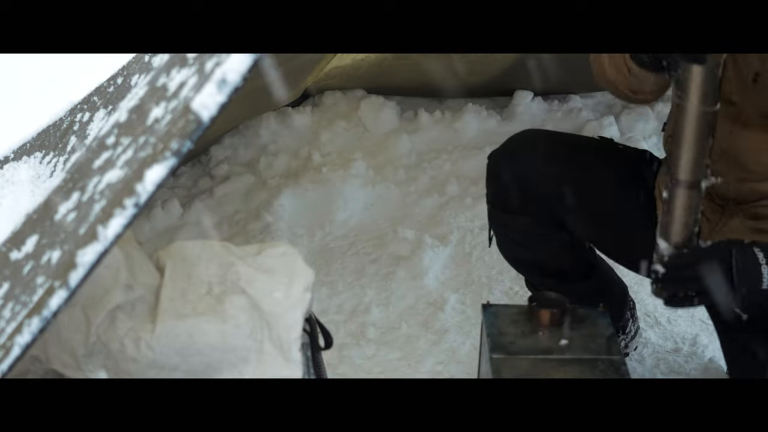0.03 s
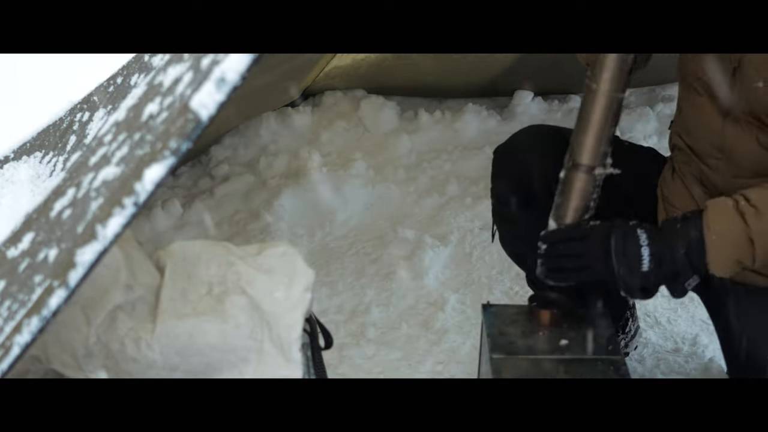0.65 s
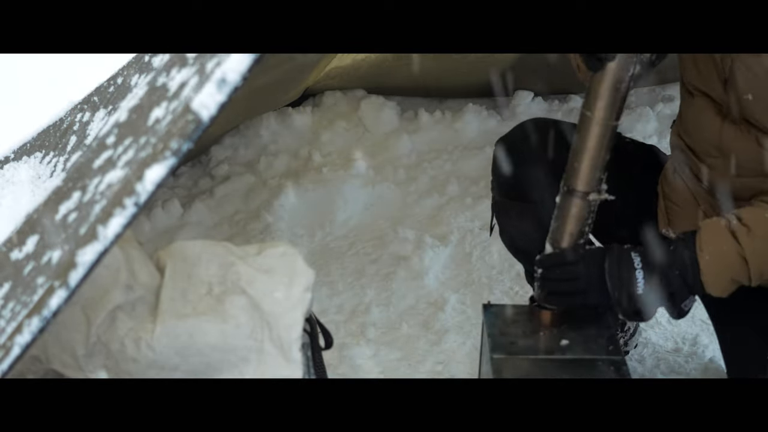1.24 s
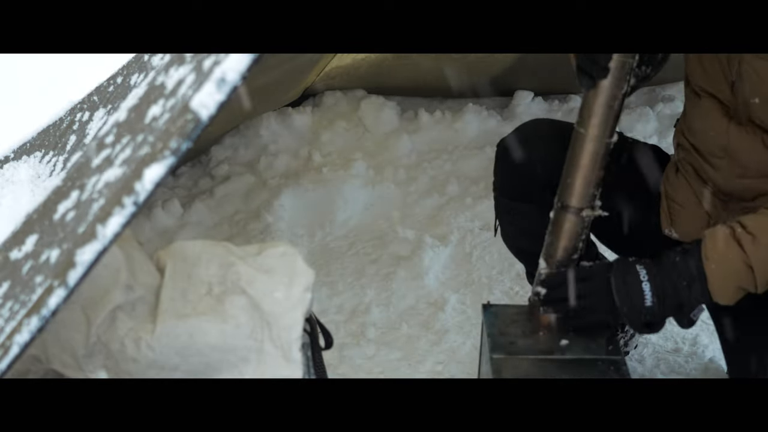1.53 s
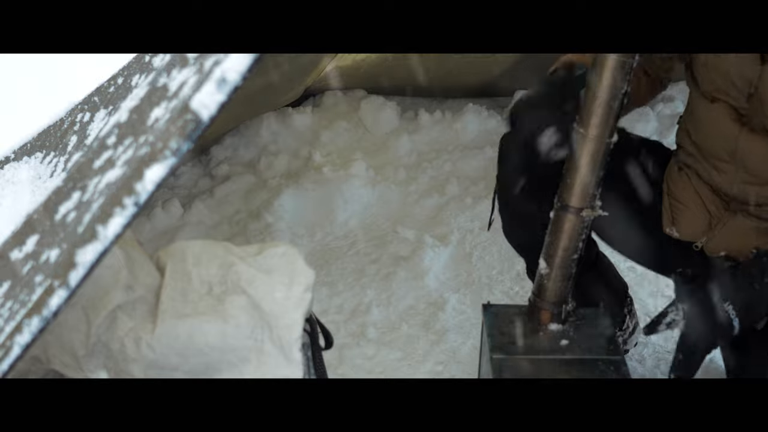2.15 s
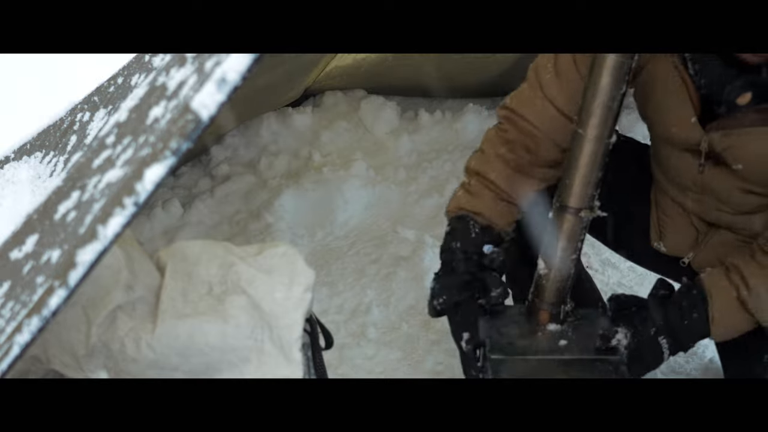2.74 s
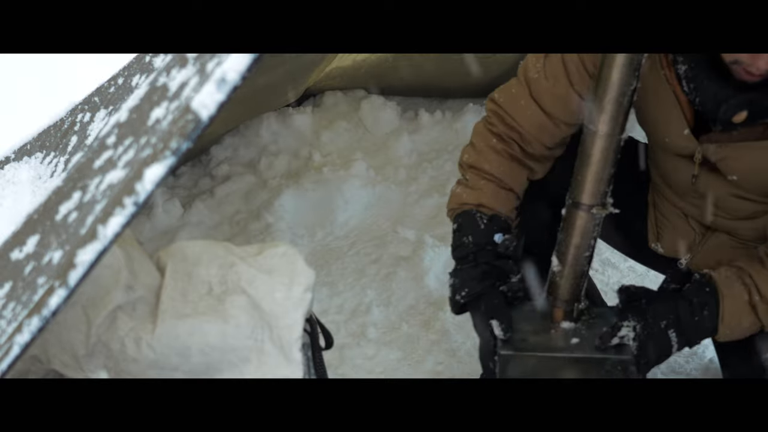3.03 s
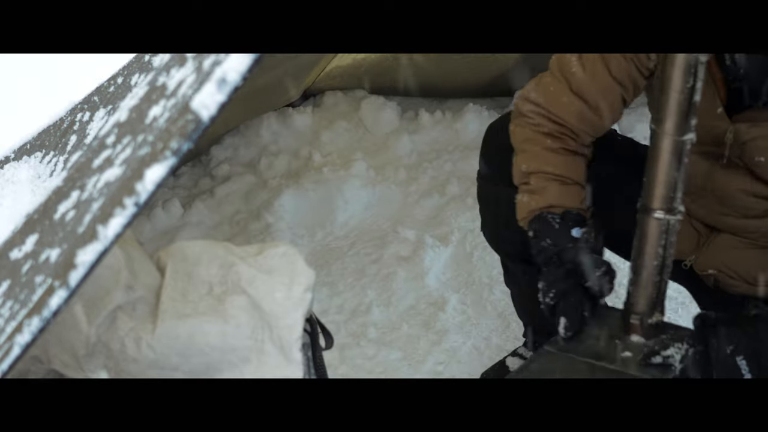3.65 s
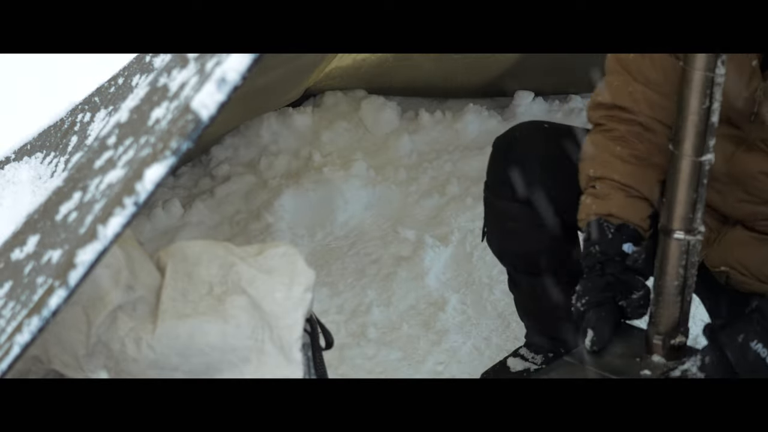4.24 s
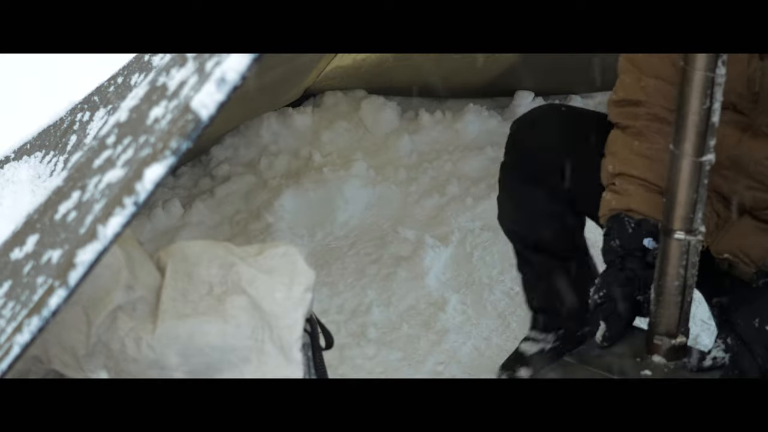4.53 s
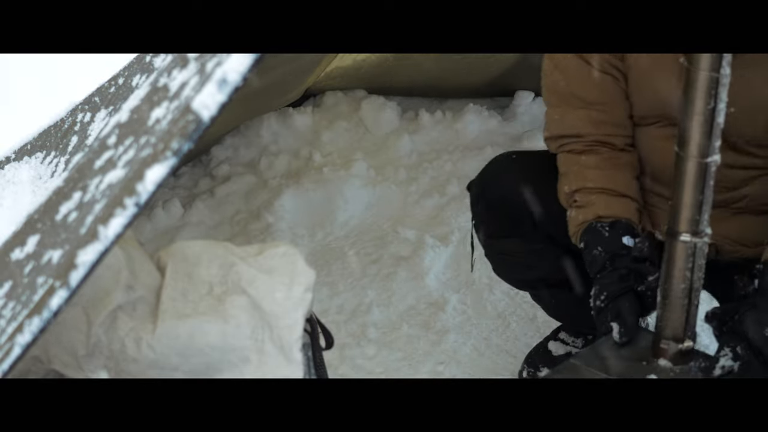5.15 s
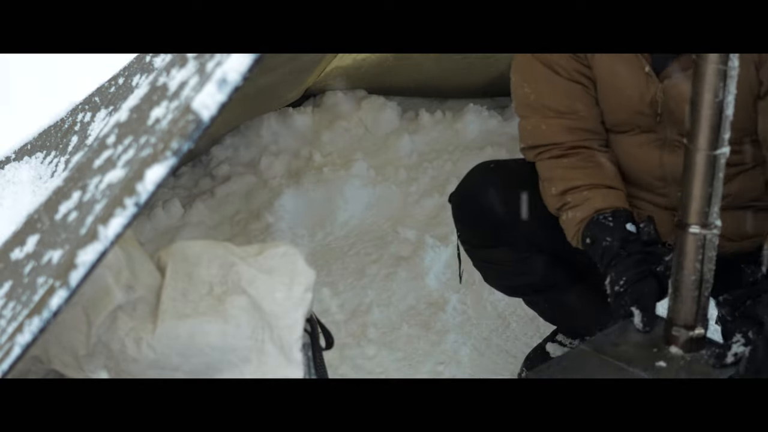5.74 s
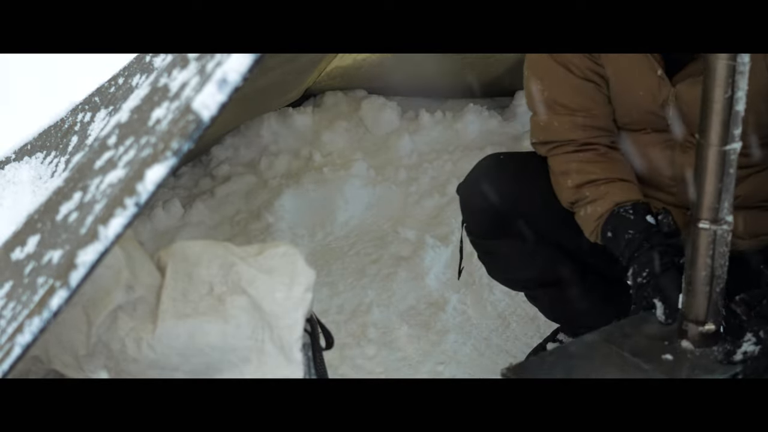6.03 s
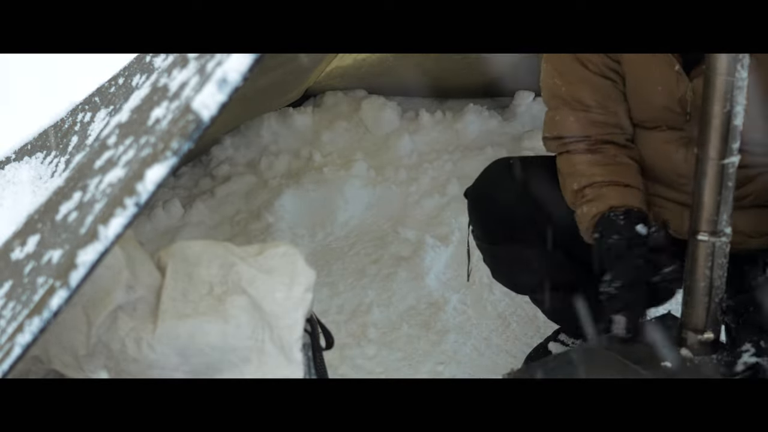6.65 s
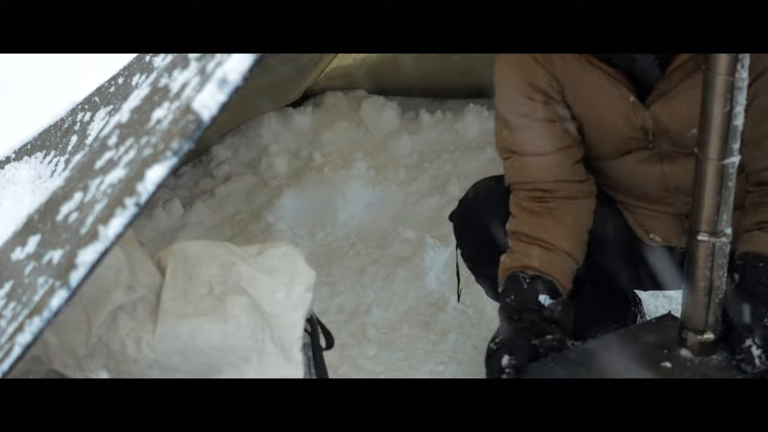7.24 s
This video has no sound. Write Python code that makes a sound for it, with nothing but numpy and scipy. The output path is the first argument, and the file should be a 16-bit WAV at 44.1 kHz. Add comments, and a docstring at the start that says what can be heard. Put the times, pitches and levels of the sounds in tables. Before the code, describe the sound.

Close, ringing metal knocks and a short scrape come first as a steel pipe is worked into a tent stove. A nylon sleeve swishes and gloves pat dully. Quieter clinks and gritty scrapes follow as the stove is nudged across snow, with one sharp, hollow knock standing out. Padded clothes rustle, knees shuffle and ice ticks lightly throughout, above a soft, steady hiss of outdoor air.

```python
"""Setting up a tent stove

In a tent on snow, a thin steel chimney pipe is knocked and worked into the collar of a small stove.
Each knock and scrape makes the sheet metal ring. Gloved hands then shift the stove: it clunks, clicks
and grinds over the snow, while padded nylon clothes rustle and swish as they rub.
Small icy ticks and dull pats sound over a soft outdoor hiss."""
import sys
import numpy as np
from scipy import signal
from scipy.fft import rfft, irfft, next_fast_len
from scipy.io import wavfile
from scipy.ndimage import uniform_filter1d, map_coordinates

SR = 44100
rng = np.random.default_rng(int(sys.argv[2]) if len(sys.argv) > 2 else 0)


def inscribe(sig):
    """Save sig as 16-bit PCM at rate SR to the path in sys.argv[1].

    A 1-D sig is mono; a 2-D sig holds one channel per row.
    Samples are clipped to [-1, 1] before scaling.
    """
    pcm = np.round(np.clip(np.atleast_2d(sig).T, -1, 1) * 32767)
    wavfile.write(sys.argv[1], SR, pcm.astype(np.int16))


N = 326340
T = np.arange(N) / SR
TOP_HZ = 15950
SEATED_S = 1.8  # from here on the pipe sits firmly in the collar

# Tone colours of five noises: pitch_hz, level_db
AIR_TONE = [(12, -24), (20, -2), (107, -1.5), (181, 1), (345, -3), (443, -10), (655, -7.5), (1020, -8),
            (1560, -11.5), (2000, -15), (3700, -13.5), (5320, -24), (6290, -20.5), (13400, -24),
            (15800, -26.5)]  # outdoor air
KNEE_TONE = [(50, -27), (100, -10.5), (150, -5), (210, 0), (320, -7.5), (450, -14), (700, -56)]  # knees on snow
CLOTH_TONE = [(250, -14), (430, -3), (650, 0.5), (1000, -0.5), (1500, -3), (2200, -3.5), (3000, -5),
              (3750, -7.5), (4400, -33), (7000, -43)]  # rubbed cloth
NYLON_TONE = [(2500, 0.5), (4200, 1), (5200, -4), (6500, 0), (8500, -4.5), (11000, -4), (14000, -5),
              (15600, -9.5)]  # hissing nylon
SCRAPE_TONE = [(150, -15), (390, 3), (540, 0), (650, -2), (830, 1.5), (1100, -3), (1400, -6), (2000, -24),
               (4000, -25.5)]  # the stove on snow
# Small icy ticks: start_s, peak_db, pitch_hz, relative_snap_db
ICE_TICKS = [(1.757,-42.5,4560,-8), (1.85,-46,3850,-22), (2.1313,-42,4000,-30), (2.546,-43,3530,-25),
             (3.2145,-31,6100,14), (3.8846,-34,4100,-13), (3.916,-30.5,2800,-12), (4.802,-41.5,2850,-24),
             (5.100,-43,2800,0), (5.305,-38,2660,-25), (5.376,-43,5500,-9), (5.598,-43,9900,-12),
             (6.161,-39.5,4160,-10), (6.581,-44,4240,-6), (7.0577,-42,3650,-29), (7.181,-47,3760,-31)]
# Shifts of weight on knees and boots: peak_s, length_s, level_db
WEIGHT_SHIFTS = [(0.583, 0.21, -60), (1.206, 0.29, -54), (1.755, .06, -60), (2.315, .1, -52),
                 (2.492, 0.042, -45.5), (2.622, 0.19, -56), (2.788, 0.067, -49), (2.966, 0.14, -49),
                 (3.193, 0.14, -53.5), (3.357, 0.13, -44.5), (3.484, 0.15, -45), (3.657, 0.2, -47.5),
                 (3.88, 0.086, -45), (4.033, 0.095, -42.5), (4.291, .08, -50), (4.498, 0.083, -53),
                 (4.783, 0.18, -52), (4.922, 0.056, -48), (5.189, .1, -45.5), (5.311, .06, -47.5),
                 (5.45, 0.14, -55.5), (5.58, 0.17, -45.5), (5.8, 0.29, -49), (5.958, 0.043, -42),
                 (6.04, 0.077, -53), (6.13, 0.38, -49.5), (6.36, 0.092, -42), (6.49, 0.085, -49)]
# Arms moving in the padded jacket: peak_s, swell_s, fade_s, level_db, relative_hiss_db
ARM_MOVES = [(0.005, 0.042, 0.071, -46.5, -6), (0.195, 0.18, 0.16, -58, 0.5), (0.6, 0.22, 0.11, -51, -1),
             (0.86, 0.52, 0.17, -72, 13), (1.185, 0.091, 0.08, -51, -7), (1.93, .07, 0.32, -60, -6.5),
             (2.27, 0.089, 0.12, -49.5, -5.5), (2.51, 0.071, 0.22, -55, -4), (3.05, 0.21, 0.27, -55.5, -7),
             (3.21, 0.14, 0.074, -61.5, 4), (3.385, 0.07, 0.15, -46.5, -5.5),
             (3.68, 0.21, 0.1, -54.5, -5.5), (4.0, 0.28, 0.08, -48.5, -5), (4.28, 0.45, 0.25, -59.5, -2.5),
             (4.52, 0.082, 0.069, -53.5, -4.5), (4.66, 0.049, 0.094, -59.5, -7),
             (5.105, 0.015, 0.027, -49, -6), (5.178, 0.018, 0.037, -41, -13),
             (4.92, 0.026, 0.055, -68, -14), (5.549, 0.042, 0.029, -45, -8), (5.73, 0.039, 0.039, -47, -17),
             (5.84, 0.072, 0.13, -49, -6.5), (6.36, 0.12, 0.044, -53, -2), (6.48, 0.023, .025, -52, -24),
             (6.66, .07, 0.088, -54.5, -6), (6.835, 0.18, .11, -49.5, -6), (7.09, 0.073, 0.049, -58, -4.5)]
# A sleeve whipping past: time_s, level_db, pitch_hz
SLEEVE_GLIDE = [(2.18, -68, 1438), (2.21, -50, 1693), (2.228, -44, 1832), (2.235, -43.5, 1990),
                (2.255, -52, 2450), (2.28, -67, 2720)]
# Dull pats: start_s, level_db, pitch_hz, relative_thud_db
DULL_PATS = [(2.11, -36, 840, -28), (2.269, -39.5, 313, 1), (2.288, -41.5, 400, 5), (2.379, -47, 300, 0),
             (2.4426, -32.5, 556, -3), (2.484, -37.5, 474, 3.5), (4.256, -40, 190, -22),
             (4.322, -52, 278, 1), (4.732, -47, 420, 4.5), (4.784, -43.5, 603, -16),
             (4.986, -37.5, 1010, -27), (5.3046, -11, 710, -8.5), (5.577, -41, 327, 7),
             (6.466, -43.5, 260, 3)]
# Tugs that drag the stove over snow: peak_s, swell_s, fade_s, level_db
STOVE_TUGS = [(3.06, 0.056, 0.1, -50.5), (3.64, 0.18, 0.12, -48), (3.99, .2, .04, -58),
              (5.6, 0.052, 0.1, -55.5), (5.84, 0.14, .06, -48.5), (6.12, 0.47, 0.15, -50),
              (6.39, 0.047, 0.037, -45.5)]
# Pushes of the pipe into the collar: peak_s, swell_s, fade_s, level_db
PIPE_PUSHES = [(1.17, 0.044, 0.18, -46.5), (1.36, 0.039, 0.28, -37), (1.5, 0.11, 0.054, -32.5),
               (1.6, 0.071, .028, -39)]
# The notes at which the stove and its pipe ring: pitch_hz, width_hz, level_db
STEEL_NOTES = [(162, 16, 5), (227, 14, 3), (287, 6.2, 16), (298, 110, 14), (605, 43, 2), (640, 7.8, 9),
               (736, 6.2, 0.5), (826, 16, 4.5), (1028, 14, 2.5), (1230, 10, -2), (1377, 54, 6.5),
               (1471, 19, 8), (1782, 49, 8), (1905, 230, -0.5), (2030, 200, -0.5), (2100, 18, -4),
               (2280, 93, 0.5), (2560, 7.7, 2), (2630, 140, -2.5), (2810, 240, -0.5), (3170, 27, -3),
               (3350, 47, 3.5), (3690, 81, 7.5), (4450, 19, -4), (6100, 75, 2), (6340, 170, 0),
               (6960, 120, -10), (7520, 78, 0)]
# Knocks on the metal: start_s, strength_db, weight_db, hardness_db, base_fade_s, spot_hz
# (spot_hz is the pitch that the struck spot brings out)
METAL_KNOCKS = [(0.008, -45.5, -25, -3.5, 0.043, 1200), (0.033, -47, -13, -8, .02, 1900),
                (0.257, -44.5, -25, -2, 0.12, 2280), (0.932, -33.5, -7, 1.5, 0.048, 2200),
                (0.9367, -33.5, 14, -8, .1, 1650), (1.027, -31.5, -23, 7.5, 0.022, 1930),
                (1.295, -46, 8, -8, 0.033, 3160), (1.3301, -17, -12, 3.5, 0.031, 2880),
                (1.346, -38.5, 4, -4.5, 0.13, 780), (1.426, -35, -10, 2, 0.064, 1330),
                (1.4627, -29, -4, -6, 0.061, 1320), (1.466, -50.5, 31, 6, 0.06, 253),
                (1.481, -38.5, -8, 4, .072, 1400), (1.5524, -20.5, -16, 0.5, 0.052, 2000),
                (1.5606, -21, -9.5, -3, 0.021, 1960), (1.593, -29.5, -16.5, 3, 0.059, 2370),
                (1.611, -35.5, -10, -5, 0.054, 2500), (2.646, -48.5, 2, -3, 0.13, 1790),
                (2.8952, -31.5, -1.5, -11, 0.095, 1840), (3.113, -44, 6, 3, .14, 950),
                (3.372, -48, 6.5, 11, 0.12, 930), (3.56, -45.5, 6, -4, 0.47, 2600),
                (3.602, -36.5, -2.5, -3.5, 0.14, 1080), (3.644, -40.5, -5, -3, .11, 720),
                (3.7081, -39.5, -4.5, -13, 0.07, 1280), (3.7947, -38, -3.5, -3.5, 0.047, 1120),
                (4.0212, -29, -20, 5.5, 0.04, 3160), (4.635, -53, -6, -3, .11, 1810),
                (5.173, -41, 5, 2.5, 0.058, 654), (5.182, -45.5, 0, 0, 0.037, 900),
                (5.193, -41.5, -1.5, 5.5, .12, 1500), (5.444, -52.5, 7, -8, 0.13, 905),
                (5.565, -45.5, -4, 0, .09, 630), (5.802, -42.5, -9, -3, 0.11, 744),
                (5.846, -38, -10.5, 5, 0.076, 2700), (5.946, -32.5, -9, 7.5, 0.017, 2240),
                (6.025, -56.5, -6, 16, 0.069, 4000), (6.415, -49.5, -2, -14, 0.12, 1800),
                (7.36, -46.5, -17, 11.5, 0.35, 2600)]
# Pitch ranges of a knock, from thump to sizzle:
# low_hz, high_hz, fade_ratio, push_db, gain_db, weight_share, hardness_share, spot_db_per_octave
KNOCK_RANGES = [(130, 362, 1.32, 22, -1.5, 0.88, 0.06, -0.5), (611, 1240, 1.55, 20, -.5, .25, 0, -4),
                (1320, 3400, 0.89, 20, 0, 0.061, 0.034, 0.5), (3520, 8460, 1.1, 15, -12, 0.18, 0.71, 4.5),
                (8950, 14800, 1.06, -5, -15.5, 0.054, 1.08, -1.5)]


def amp(db):
    """Turn decibels into a factor to multiply by."""
    return 10 ** (np.asarray(db) / 20)


def unit(x):
    """Scale a signal to an average (rms) size of 1."""
    return x / np.sqrt(np.mean(x ** 2) + 1e-20)


def wobble(rate):
    """A smooth curve through `rate` random points a second."""
    return map_coordinates(rng.standard_normal(int(N * rate / SR) + 4), [T * rate])


def filtered(x, response):
    """Multiply each frequency in x by response(hz)."""
    size = next_fast_len(x.shape[-1] + 8192)
    return irfft(rfft(x, size) * response(np.fft.rfftfreq(size, 1 / SR)), size)[..., :x.shape[-1]]


def coloured(x, tone):
    """Give x a tone colour from a table, at an average size of 1."""
    pitch_hz, db = np.transpose(tone)
    return unit(filtered(x, lambda hz: amp(np.interp(np.log(hz + 1), np.log(pitch_hz), db))))


def band(x, low_hz, high_hz, order=3):
    """Let through the sound between two pitches."""
    return signal.sosfilt(signal.butter(order, [low_hz, high_hz], "band", fs=SR, output="sos"), x)


def add(track, s, sound):
    """Mix a sound into the track, starting at s seconds."""
    room = track[max(round(s * SR), 0):][:len(sound)]
    room += sound[:len(room)]


def rustle(tone, patchy_db, grain_db):
    """Rubbing noise, clumped into grains and drifting in colour."""
    grains = rng.standard_normal(N) * amp(grain_db * wobble(350))
    spectrum = signal.stft(grains, nperseg=512)[2]
    patches = uniform_filter1d(rng.standard_normal(spectrum.shape), size=5, axis=0)
    patches = unit(uniform_filter1d(patches, size=7, axis=1))
    return coloured(signal.istft(spectrum * amp(patchy_db * patches), nperseg=512)[1][:N], tone)


def strokes(rows, drop_db=11.5, roundness=1.55):
    """Loudness curve of rubbing strokes: each speeds up to its peak and slows again."""
    power = np.zeros(N)
    for peak_s, swell_s, fade_s, db in rows:
        near = slice(max(int((peak_s - 5 * swell_s) * SR), 0), int((peak_s + 5 * fade_s) * SR))
        away = np.abs(T[near] - peak_s) / np.where(T[near] < peak_s, swell_s, fade_s)
        power[near] += amp(db - drop_db * away ** roundness) ** 2
    return np.sqrt(power)


def outdoor_air():
    """A soft, steady hiss behind everything."""
    return amp(-60.5) * coloured(rng.standard_normal(N), AIR_TONE)


def crackle(rubbing, per_second, gain_db, spread_db):
    """Crusted snow and stiff folds let go in tiny snaps, louder with more movement."""
    snaps = (rng.random(N) < per_second / SR) * amp(spread_db * rng.uniform(-1.1, 1, N))
    return band(snaps * rubbing * amp(gain_db), 1300, 5000, order=1)


def ice_ticks(fade_s):
    """Icy grains: each is a brief, loosely pitched tick with a bright snap."""
    out, t = np.zeros(N), np.arange(SR // 20) / SR
    for start_s, peak_db, hz, snap_db in ICE_TICKS:
        burst = rng.standard_normal(len(t)) * amp(-60 * t / fade_s)
        tick = band(burst, hz * 0.78, hz * 1.17, order=2) + amp(snap_db) * band(burst, 1200, 11800)
        add(out, start_s, amp(peak_db) * tick / np.abs(tick).max())
    return out


def body_movement():
    """Loudness curves for the clothes: arms rub the jacket, legs rub snow and trousers."""
    fidget = amp(3.3 * wobble(10))  # a crouching body is never quite still
    legs = strokes([(s, length / 2, length / 2, db) for s, length, db in WEIGHT_SHIFTS])
    trousers = amp(-8) * legs
    arms = strokes([row[:4] for row in ARM_MOVES])
    nylon = strokes([(s, swell, fade, db + hiss_db) for s, swell, fade, db, hiss_db in ARM_MOVES])
    shuffling = np.hypot(legs, amp(-66.5) * fidget)
    rubbing = np.hypot(np.hypot(arms, trousers), amp(-63) * fidget)
    hissing = np.hypot(nylon, amp(-69) * fidget)
    return shuffling, rubbing, hissing


def clothes(shuffling, rubbing, hissing):
    """Knees shuffle on the snow while cloth rubs and nylon hisses."""
    folds = wobble(70)
    knees = shuffling * amp(-2 + 1.6 * wobble(40)) * rustle(KNEE_TONE, patchy_db=3.5, grain_db=3.5)
    cloth = rubbing * amp(-0.24 + 1.95 * folds) * rustle(CLOTH_TONE, patchy_db=2.2, grain_db=1.5)
    hiss = hissing * amp(1 + 0.71 * folds) * rustle(NYLON_TONE, patchy_db=1.5, grain_db=1.5)
    return knees + cloth + hiss


def sleeve(scatter):
    """Nylon ribs sliding over each other sing higher as the arm speeds up."""
    times, levels, pitches = np.transpose(SLEEVE_GLIDE)
    hz = np.interp(T, times, pitches) * (1 + scatter * wobble(1500))
    zipping = unit(np.sin(2 * np.pi * np.cumsum(hz) / SR))
    return amp(np.interp(T, times, levels)) * zipping * (T > times[0]) * (T < times[-1])


def pats(cycles_to_peak, rebound_s, rebound_share, thud_hz, thud_fade_s):
    """Each soft touch makes a few dying swings, a weaker rebound and a low thud."""
    out, t = np.zeros(N), np.arange(SR // 8) / SR
    for start_s, db, hz, thud_db in DULL_PATS:
        swing = np.sin(2 * np.pi * hz * t) * (hz * t) ** 2 * np.exp(-2 * hz * t / cycles_to_peak)
        swing /= np.abs(swing).max()
        thud = amp(thud_db - 60 * t / thud_fade_s) * np.sin(2 * np.pi * thud_hz * t)
        add(out, start_s, amp(db) * (swing + thud))
        add(out, start_s + rebound_s, amp(db) * rebound_share * swing)
    return band(out, 107, 3000, order=2)


def stove_drag():
    """The stove grinds over packed snow with a hollow, gritty scrape."""
    return strokes(STOVE_TUGS) * rustle(SCRAPE_TONE, patchy_db=2, grain_db=-1.5)


def steel_ring(force, damping_hz, tuning=1):
    """Sheet metal rings at its own notes when pushed; more damping stops them sooner."""
    def response(hz):
        notes = sum(
            amp(db) * 1j * hz * width / ((pitch * tuning) ** 2 - hz ** 2 + 1j * hz * (width + damping_hz))
            for pitch, width, db in STEEL_NOTES)
        return notes + amp(-4)  # the flat part stands for many weak notes
    return filtered(force, response)


def pipe_slide():
    """Steel drags on steel in tiny slips that ring the metal, while the rubbing damps it."""
    slip_tone = [(80, -37), (170, -2.5), (285, 4), (420, -6.5), (800, -1.5), (2000, -1.5),
                 (3600, -3), (4600, -11), (15000, -10)]  # pitch_hz, level_db
    slips = rustle(slip_tone, patchy_db=1.5, grain_db=3)
    return strokes(PIPE_PUSHES) * unit(steel_ring(slips, damping_hz=35))


def metal_knocks(crack_db, crack_fade_s, tail_db, tail_fade_s, rise_s, grip_damping_hz):
    """Each knock is a push, a sharp crack and a dying chatter of loose sheets, which ring the steel."""
    t = np.arange(SR // 3) / SR
    start_s, strength_db, weight_db, hardness_db, base_fade_s, spot_hz = (
        np.transpose(METAL_KNOCKS)[:, :, None])
    count = len(METAL_KNOCKS)
    chatter = rng.standard_normal((count, len(KNOCK_RANGES), len(t)))
    crack = amp(crack_db - 60 * t / crack_fade_s)
    tail = amp(tail_db - 60 * t / tail_fade_s)
    forces = np.zeros((len(KNOCK_RANGES), count, len(t)))
    for k, (_, _, fade_ratio, push_db, *_) in enumerate(KNOCK_RANGES):
        fading = amp(-60 * t / (base_fade_s * fade_ratio)) + crack + tail
        forces[k] = chatter[:, k] * fading * (1 - np.exp(-t / rise_s))
        forces[k, :, SR // 2000] += amp(push_db)  # one clean push, half a millisecond in

    def spot_boost(hz):
        """The struck spot brings out the notes near its own pitch."""
        return 1 + 2j * hz * spot_hz / (6 * (spot_hz ** 2 - hz ** 2) + 1j * hz * spot_hz)

    tuning = 1 + 0.012 * rng.standard_normal((count, 1))  # the changing load detunes the sheets
    damping_hz = grip_damping_hz * (start_s > SEATED_S)  # gloves grip the stove once the pipe is in
    rings = steel_ring(filtered(forces, spot_boost), damping_hz, tuning)
    sounds = np.zeros((count, len(t)))
    spot_octaves = np.log2(spot_hz / 1370)  # distance from the usual spot's pitch
    # a heavy knock thumps, a hard one sizzles, and a low-pitched spot gives more body
    for k, (low_hz, high_hz, _, _, gain_db, heavy, hard, db_per_octave) in enumerate(KNOCK_RANGES):
        colour_db = heavy * weight_db + hard * hardness_db + db_per_octave * spot_octaves
        ring = band(rings[k], low_hz, high_hz)
        opening_size = np.sqrt(np.mean(ring[:, :SR // 80] ** 2, axis=1, keepdims=True))
        sounds += ring / opening_size * amp(strength_db + gain_db + colour_db)
    out = np.zeros(N)
    for s, sound in zip(start_s[:, 0], sounds):
        add(out, s, sound)
    return out


def scene():
    """Mix metal, handling, snow and air into one channel."""
    metal = metal_knocks(crack_db=-7, crack_fade_s=0.012, tail_db=-11, tail_fade_s=0.078,
                         rise_s=0.00034, grip_damping_hz=24.2)
    metal += pipe_slide()
    shuffling, rubbing, hissing = body_movement()
    handling = clothes(shuffling, rubbing, hissing) + sleeve(scatter=0.15) + stove_drag()
    handling += pats(cycles_to_peak=0.66, rebound_s=0.00245, rebound_share=0.33,
                     thud_hz=277, thud_fade_s=0.033)
    snow = ice_ticks(fade_s=0.014) + crackle(rubbing, per_second=31, gain_db=19, spread_db=11)
    return (metal + handling + snow + outdoor_air())[None]


def record(dry):
    """Cut away the very highest treble."""
    return filtered(dry, lambda hz: hz < TOP_HZ)


dry = scene()
out = record(dry)
inscribe(out)
```